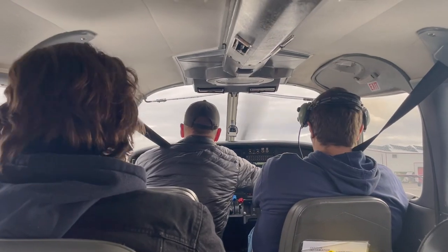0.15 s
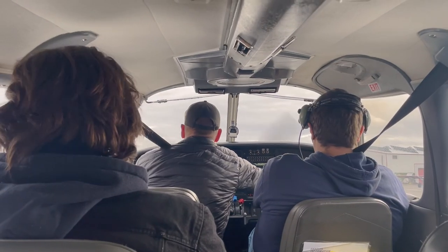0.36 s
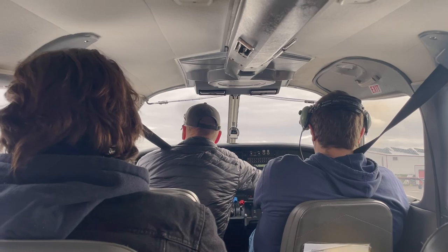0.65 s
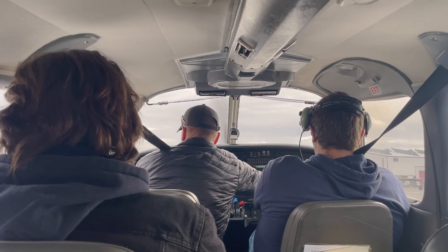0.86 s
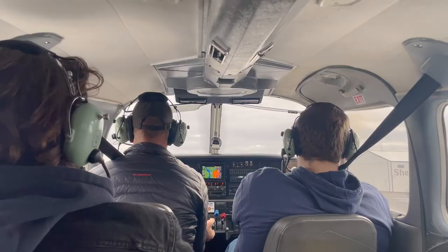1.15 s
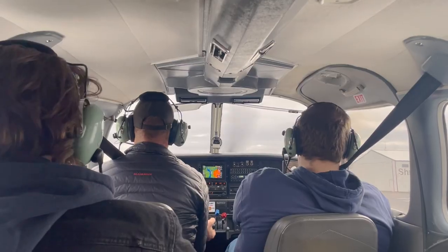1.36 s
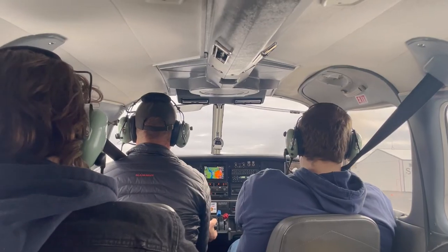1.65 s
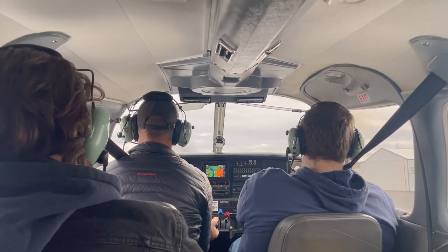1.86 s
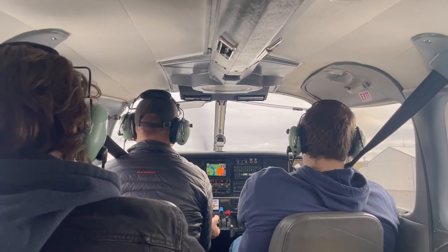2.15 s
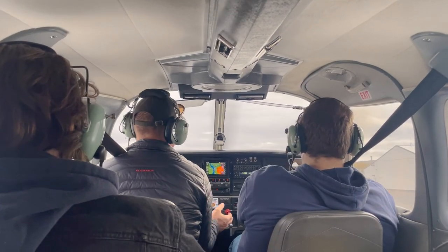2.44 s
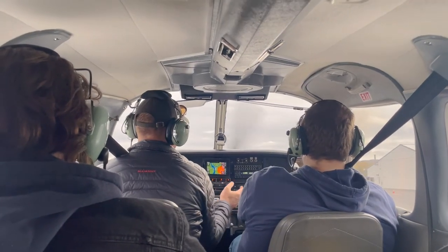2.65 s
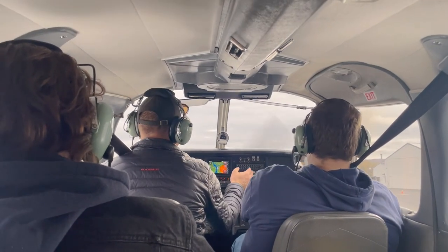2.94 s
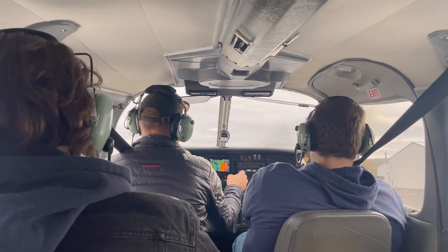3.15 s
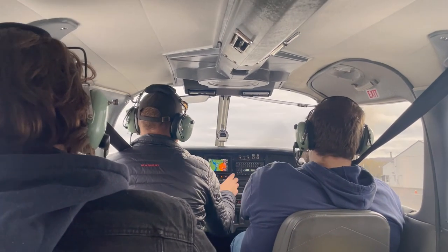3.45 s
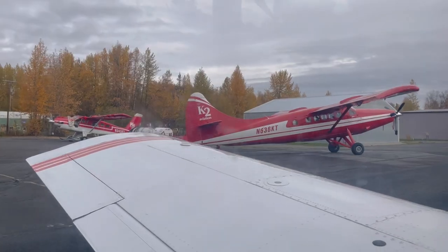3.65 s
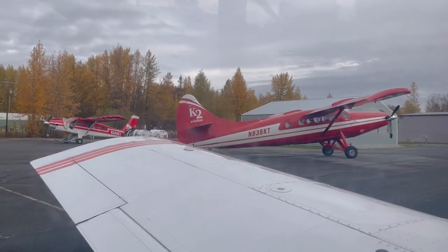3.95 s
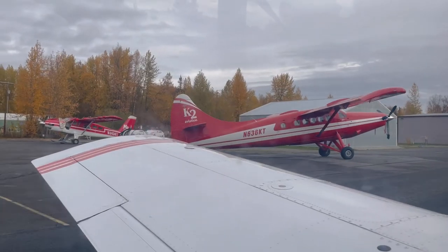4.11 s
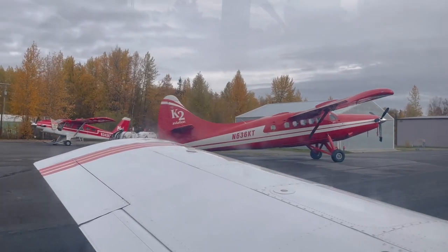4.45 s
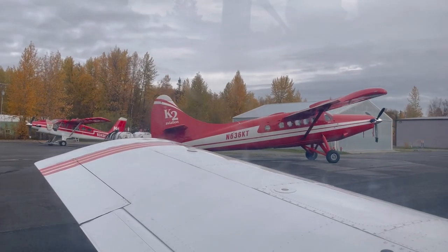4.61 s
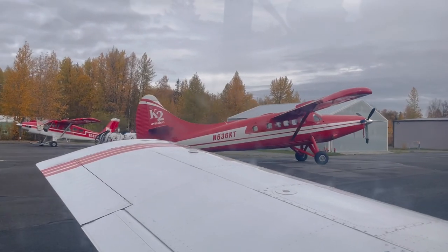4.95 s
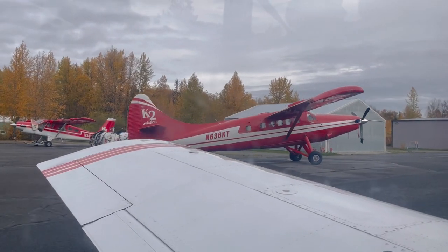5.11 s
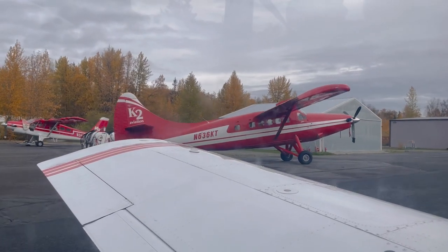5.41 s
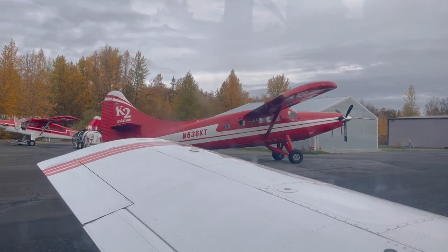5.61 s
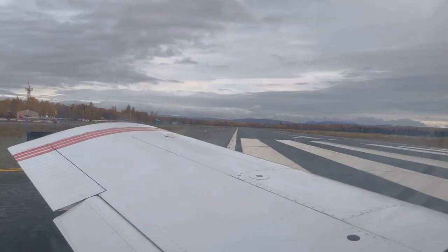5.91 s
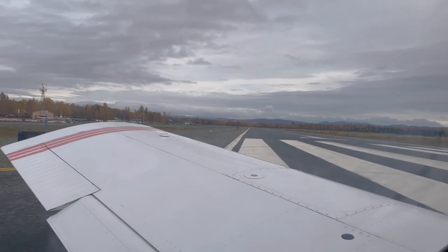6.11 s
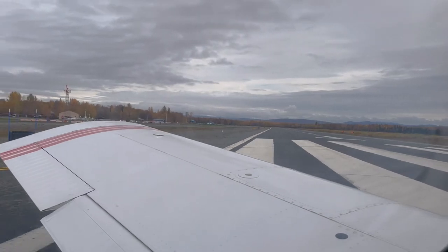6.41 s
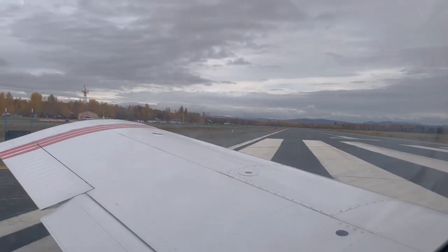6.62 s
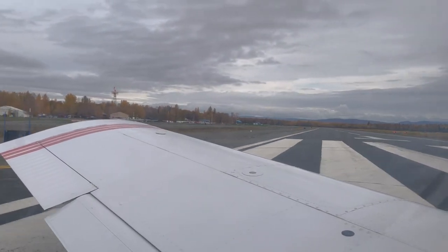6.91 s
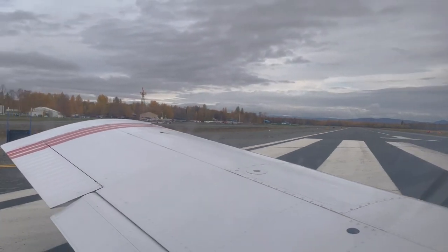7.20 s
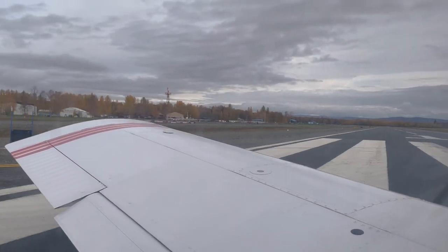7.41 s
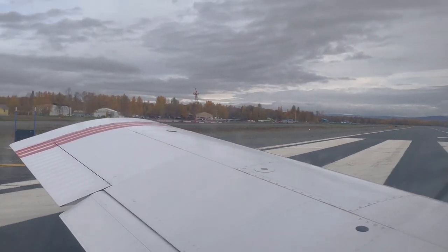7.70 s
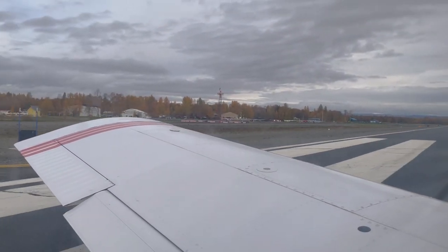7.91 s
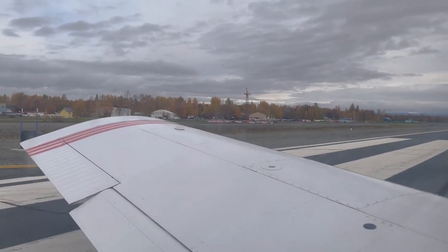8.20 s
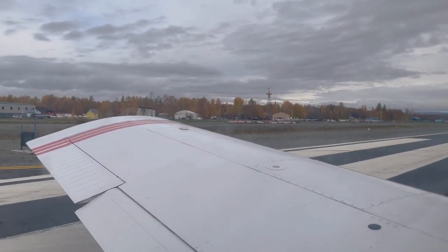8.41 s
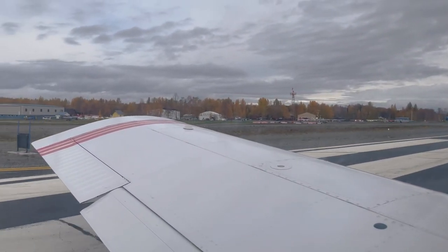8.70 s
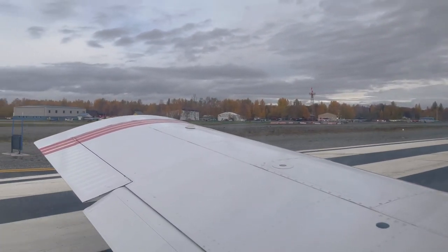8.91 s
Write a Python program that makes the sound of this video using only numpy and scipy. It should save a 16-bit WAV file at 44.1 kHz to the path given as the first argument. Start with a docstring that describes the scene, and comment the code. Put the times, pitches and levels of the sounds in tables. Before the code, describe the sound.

A stereo microphone inside a light aircraft catches four abrupt stretches of continuous engine. First a rough, rumbling lope, then a smoother throbbing idle with airy clatter, soft plastic clicks and barely audible electrical whine. A brief dropout leads to a fuller, bassier drone near the window with dry, dense trim rattles that thin out; finally the taxiing engine runs faster and stronger, the ticks continuing, then sparse near the end.

```python
"""Inside the cabin of a small piston aircraft: four moments that follow one another abruptly.
From mid cabin the freshly started engine lopes, then idles evenly; after a short gap it is heard
close by the wing window, then taxiing faster. Shaft orders make the propeller and exhaust boom,
shaped noise makes wash and clatter pulsing with the shaft, and short noise bursts make the ticks
of the window trim, the engine's clacks and the gear clicks. Faint sines whine in the panel."""
import sys
import numpy as np
from scipy.fft import rfft, irfft, next_fast_len
from scipy.io import wavfile
from scipy.ndimage import uniform_filter1d, minimum_filter1d, map_coordinates

SR = 44100
rng = np.random.default_rng(int(sys.argv[2]) if len(sys.argv) > 2 else 0)


def master(y):
    """Save y as 16-bit WAV."""
    cut = np.clip(np.atleast_2d(y).T, -1, 1)
    pcm = np.round(cut * 32767)  # scale
    wavfile.write(sys.argv[1], SR, pcm.astype(np.int16))


N = 399546

# the four moments: start_s, end_s, shaft angle at the start [turns]
COLD_SPAN = (0, 1.18, .547)
IDLE_SPAN = (1.18, 3.485, -.16)
WING_SPAN = (3.5155, 5.768, -.007)
TAXI_SPAN = (5.768, 9.1, -.287)
# shaft speed, held beyond the end points; the idle sags, and the throttle opens at the end of
# the taxi: time_s, shaft_hz
COLD_SPEED = [(0, 17.013)]
IDLE_SPEED = [(1.18, 20.333), (2.2, 20.227), (2.95, 20.193), (3.25, 19.973)]
WING_SPEED = [(3.5, 20.747)]
TAXI_SPEED = [(8.5, 23.609), (9.05, 23.853)]
# crankshaft orders, 3 = blades and firings, 1.5 = one bank, other halves = unequal cylinders:
# order [multiple of shaft speed], relative level_db
COLD_ORDERS = [(1.0, -50), (2.0, -36), (3.0, -24), (4.5, -16.5), (5.0, -31.5), (5.5, -42), (6.0, -28.0),
               (6.5, -36), (7.0, -35), (7.5, -41), (8.0, -41), (9.0, -25.5), (9.5, -45.0), (10.0, -37),
               (10.5, -44), (11.0, -37), (11.5, -56.5), (12.0, -58), (12.5, -50), (13.0, -53), (13.5, -51),
               (14.0, -49), (14.5, -61.5), (15.0, -46), (17.0, -57), (17.5, -57), (18.0, -54.5),
               (23.5, -65.5), (24.0, -55.5), (25.5, -58), (27.0, -51.5), (28.0, -67), (31.0, -66),
               (34.0, -55.5), (36.5, -70.5), (38.5, -73), (39.0, -65), (40.0, -68.0), (42.0, -60),
               (44.0, -72.5), (58.5, -63)]
IDLE_ORDERS = [(1.0, -51.5), (1.5, -36.5), (2.0, -39.5), (3.0, -14), (3.5, -34), (4.0, -44.0), (4.5, -16.5),
               (5.0, -49.5), (5.5, -48), (6.0, -20), (6.5, -36), (7.0, -49.5), (7.5, -29), (8.0, -42),
               (8.5, -41.5), (9.0, -35.5), (9.5, -54.5), (10.0, -49), (10.5, -41), (11.0, -51.5),
               (12.5, -56), (13.0, -60), (13.5, -61), (14.0, -60), (14.5, -59), (15.0, -60), (15.5, -58.0),
               (16.0, -50), (16.5, -55.5), (17.0, -60), (19.5, -56.5), (22.0, -56.5), (23.0, -67.5),
               (23.5, -56.5), (24.0, -60), (25.0, -57.0), (25.5, -61), (28.5, -56), (29.0, -60.5)]
WING_ORDERS = [(1.0, -58.5), (1.5, -40.5), (2.0, -42), (3.0, -11), (4.0, -43), (4.5, -21.5), (5.0, -22.5),
               (5.5, -44), (6.0, -18.0), (6.5, -39.0), (7.0, -51.5), (7.5, -24.0), (8.0, -41), (8.5, -30),
               (9.0, -47), (9.5, -56.5), (10.0, -32), (10.5, -34.5), (11.0, -42.5), (11.5, -59.5),
               (12.0, -48), (12.5, -45.5), (13.0, -48), (13.5, -54.5), (14.0, -48), (14.5, -47),
               (15.0, -42.5), (15.5, -40), (16.5, -52), (17.0, -50.5), (17.5, -57.5), (18.0, -49),
               (19.0, -69), (19.5, -61.5), (20.0, -63), (20.5, -58.5), (21.0, -51.5), (21.5, -60),
               (22.0, -59), (22.5, -58), (23.0, -65), (23.5, -54.5), (24.0, -47.5), (25.0, -56),
               (25.5, -63.5), (27.0, -60.5), (30.0, -59.5), (33.0, -54.5), (33.5, -61.5)]
TAXI_ORDERS = [(1.5, -35), (2.0, -42), (3.0, -9.0), (4.0, -34.5), (4.5, -22.0), (5.0, -31.5), (5.5, -36.5),
               (6.0, -17.5), (6.5, -42.5), (7.0, -36.5), (7.5, -25.0), (8.0, -50.5), (8.5, -49.5),
               (9.0, -40.5), (9.5, -46.5), (10.0, -41), (10.5, -44), (11.0, -56.5), (11.5, -62.5),
               (12.0, -43.5), (12.5, -49.5), (13.0, -49), (13.5, -53.5), (14.0, -49), (14.5, -58),
               (15.0, -43.5), (15.5, -47.5), (16.5, -55.5), (17.0, -55.5), (17.5, -52.5), (18.0, -64),
               (18.5, -65), (19.0, -58.5), (19.5, -58.5), (20.0, -50), (20.5, -50), (21.5, -69),
               (22.5, -53.5), (23.0, -63.5), (24.0, -60.5), (24.5, -55.5), (25.0, -57.5), (25.5, -57.5),
               (26.0, -58), (27.0, -65), (27.5, -62), (29.5, -65), (30.5, -66), (31.5, -56), (32.0, -63),
               (32.5, -58.5), (33.0, -58)]
# the cabin's answer to one exhaust puff: frequency_hz, relative level_db
EXHAUST_BOOM = [(14, -51.5), (25, -19), (40, -5.5), (62, -2.5), (90, -9), (130, -3.5), (175, -11.5),
                (230, -20), (320, -46), (600, -79), (2000, -130)]
# propeller wash and engine clatter through the hull: frequency_hz, relative level_db
COLD_WASH = [(160, -45.5), (280, -5.5), (350, -6.5), (430, -5), (530, -11), (720, -10), (870, -5),
             (980, -9.5), (1090, -6), (1400, -17.5), (1620, -17.5), (1840, -16), (1970, -20), (2700, -30),
             (2890, -25.5), (3300, -30.5), (5000, -33.5), (5700, -37.5), (6700, -35), (7700, -45),
             (13400, -39.5), (16000, -48.5)]
IDLE_WASH = [(140, -37), (240, -3), (312, -3.5), (421, -12.5), (485, -5.5), (545, -9.5), (590, -7),
             (640, -8), (690, -5), (790, -8.5), (860, -4), (950, -5), (1110, -6.5), (1200, -11),
             (1500, -10.5), (1590, -19.5), (1820, -12), (2020, -23.5), (2280, -19.5), (2500, -28),
             (2920, -24), (3600, -31.5), (4600, -30.5), (5500, -38.5), (6500, -35.5), (7800, -48.5),
             (13400, -38.5), (16000, -46.5)]
WING_WASH = [(150, -39.5), (240, -13), (330, -10), (420, -11.5), (510, -14), (570, -23), (640, -17.5),
             (820, -24), (910, -19), (1000, -25.5), (1450, -23), (1850, -33.5), (2400, -32), (3200, -37.5),
             (4500, -43), (6250, -48), (8600, -55.5), (13400, -47.5), (16000, -66)]
TAXI_WASH = [(140, -27.5), (230, -6), (290, -6), (360, -10.5), (470, -13), (600, -19.5), (667, -20),
             (769, -19.5), (969, -21), (1060, -15.5), (1200, -24.5), (1300, -23), (1700, -29), (2040, -31),
             (2660, -30), (3700, -39), (5000, -40.5), (5700, -44.5), (6950, -45.5), (8600, -54.5),
             (12900, -44), (16000, -61)]
# clatter of the six cylinders in firing order: mean rise of each stroke over the lull [dB]
COLD_STROKES = [1.8, 3.5, 2, 1.4, 3.3, 1.2]
IDLE_STROKES = [3.3, 4.9, 3.5, 2.4, 2, 5.8]
WING_STROKES = [2.9, 1.2, 3.5, 4.1, 1, 3.4]
TAXI_STROKES = [4, 1.8, 3.6, 4.8, 0.67, 1.7]
# stereo width in mid cabin and at the window: frequency_hz, relative side_level_db
AISLE_WIDTH = [(60, -28.5), (110, -10), (200, -2.5), (380, -4.5), (700, -3.5), (1290, -2), (2380, -2.5),
               (4400, -3), (8120, 7), (15000, -5.5)]
WINDOW_WIDTH = [(60, -16.5), (110, -15), (200, -16), (380, -4), (700, 6), (1290, 4.5), (2380, -3.5),
                (4400, -4), (8120, 9), (15000, -6.5)]
# lean of the wash: frequency_hz, left_minus_right_db
WASH_LEAN = [(200, 9), (350, 3), (700, 4), (1400, 1.5), (2500, -1), (5000, 2.5), (10000, -1)]
# the upper orders are stronger on the left: frequency_hz, relative lean_db (added left, taken right)
DRONE_LEAN = [(180, 0), (280, 1.5), (700, 2.5)]
# harder clacks of the engine, around the start of the idle and later in it: start_s, level_db
KNOCKS = [(1.098, -36), (1.112, -36), (1.278, -34.5), (1.381, -38), (1.472, -35.5), (1.51, -43),
          (2.263, -42)]
# their colour through the hull: frequency_hz, relative level_db
KNOCK_COLOUR = [(300, -17.5), (800, 4.5), (1300, -4), (2300, -20), (4000, -34), (8000, -51)]
# ticks of the window trim, in relative levels: start_s, panel knock_db, edge snap_db,
# higher ring_db, sizzle_db
TICKS = [(3.5376, -32, -37.5, -46.5, -49.5), (3.5723, -27.5, -37, -38, -44.5),
         (3.6149, -27.0, -35.5, -37.5, -44.5), (3.6363, -48.0, -63.5, -50, -50.5),
         (3.74, -28.5, -39, -47.5, -42.5), (3.783, -27.5, -47.5, -44.5, -44.5),
         (3.8373, -35, -46.5, -43.5, -46.5), (3.8845, -32, -41.5, -46.5, -45.5),
         (3.9555, -34, -44.5, -48, -48.5), (3.9956, -28, -41, -49, -49.5),
         (4.0125, -38, -42.5, -50.5, -49.5), (4.0224, -34, -45.5, -48, -47), (4.054, -29.5, -34, -45, -43),
         (4.1002, -25.5, -42, -40, -41.5), (4.149, -28, -38, -43.5, -43), (4.177, -40, -45.0, -51.5, -53),
         (4.2077, -32.0, -45.5, -46.5, -47.0), (4.2234, -31.5, -45.0, -46.5, -49),
         (4.267, -28, -37, -42, -47), (4.3225, -35, -49.5, -47, -50), (4.4869, -34.0, -37.0, -46.5, -42),
         (4.5688, -29, -38, -40.5, -43), (4.5808, -38, -40.5, -45.5, -47.5), (4.7046, -31, -39, -47.5, -44),
         (4.7642, -44, -50, -55.5, -53.5), (4.8017, -36.5, -38.5, -47, -45.5),
         (4.8994, -41, -43.5, -49.5, -55), (4.9214, -36.0, -40.5, -50, -48.5),
         (5.0179, -28, -36.5, -47.5, -43), (5.2345, -44, -50.5, -51, -47), (5.3305, -30, -40, -42, -42),
         (5.4025, -47, -50, -55.5, -54.5), (5.5015, -44, -48.5, -54, -49.5),
         (5.8118, -36.0, -41.5, -44, -48), (5.852, -37, -38, -48, -48), (5.9992, -41, -38.0, -52, -48),
         (6.0243, -39, -44, -56, -62.5), (6.1392, -34, -36.5, -47.5, -47.5),
         (6.1694, -36.5, -37.5, -51.5, -52), (6.2594, -39, -44, -50, -55.0),
         (6.2711, -42.5, -51.5, -51.5, -48.5), (6.3195, -41.5, -42.5, -49, -52),
         (6.3425, -45, -45.5, -58, -67.5), (6.391, -32, -42, -51.5, -50.0), (6.4053, -37, -49, -52, -61),
         (6.4572, -40, -39.5, -48, -50.5), (6.4825, -35, -38.5, -45, -46), (6.4892, -35, -41, -49, -48),
         (6.547, -33, -41.5, -51.5, -51), (6.797, -36, -39.0, -51, -49.0),
         (6.8968, -45.5, -47.5, -57, -46.0), (6.9977, -34, -49, -54.5, -58.5),
         (7.0813, -34.5, -37, -38.5, -40.5), (7.2361, -46, -39, -54, -49.5),
         (7.263, -39, -36.5, -51.5, -48), (7.3467, -34.5, -40, -43, -44.5), (7.425, -33.5, -41, -51, -49),
         (7.4637, -35.5, -42, -46.5, -42.5), (7.5484, -28.5, -32.5, -43, -46),
         (7.6892, -39, -37.5, -43.5, -45), (7.7173, -36, -47, -50.5, -50), (7.7758, -36, -37, -50.5, -45.0),
         (7.8673, -44.5, -51, -55, -67), (7.9275, -33.5, -43, -49, -45),
         (7.9755, -41.5, -39.5, -49.5, -50.0), (8.0029, -33, -33.5, -49, -43.0),
         (8.0149, -35.5, -41.5, -46.5, -50.5), (8.268, -52, -57.5, -61.5, -49),
         (8.3056, -45.5, -44, -54.5, -49), (8.3197, -23, -35, -45.5, -42), (8.3505, -37, -46.5, -51.0, -52),
         (8.4001, -37.5, -36, -43, -45), (8.4175, -38.0, -56, -67, -51.0),
         (8.438, -41.5, -54, -49.5, -54.5), (8.5525, -40, -37.5, -38.5, -41.5), (8.9, -39, -45, -50.5, -57)]
# resonances of the panel, the edge's snap and its higher ring: centre_hz, width_hz, relative level_db
PANEL_RESONANCES = [(700, 550, -5), (920, 63, 3.5), (1400, 850, -2), (1800, 300, -6)]
SNAP_RESONANCES = [(1770, 690, -4.5), (2320, 250, 1), (2770, 420, -1), (3320, 440, -8)]
RING_RESONANCES = [(4700, 790, -9), (5350, 290, 7.5), (6100, 340, -6), (7200, 750, -12)]
# the broad crack of the contact: frequency_hz, relative level_db
CRACK = [(400, -22), (1200, -9), (3000, -10), (7000, -15), (11000, -26)]
# the sizzle above it: frequency_hz, relative level_db
SIZZLE_COLOUR = [(5000, -24), (8500, -13.5), (10500, -0.5), (13000, 3), (16000, 0)]
# small clicks of gear in the cabin: start_s, relative peak_db
GEAR = [(0.111, -37.5), (0.136, -37), (0.3074, -31), (0.335, -22.5), (0.3411, -31.5), (1.4667, -31),
        (1.5689, -36), (1.6373, -33.5), (1.6932, -35), (2.413, -27.5), (2.731, -30.5), (2.8411, -32),
        (2.969, -35.5), (3.258, -33.5), (3.3044, -35), (3.3972, -31)]
# their colour: frequency_hz, relative level_db
GEAR_COLOUR = [(400, -0.5), (1000, 2.5), (2500, 2.5), (4000, -2.5), (6000, -1), (9000, -11.5), (13000, -7),
               (16000, -16.5)]
# the main whine of the instrument panel, before its flicker: time_s, pitch_hz, level_db
PANEL_WHINE = [(0, 4447, -71), (0.5, 4447, -75), (1.12, 4447, -74), (1.125, 4511, -68), (2.45, 4511, -68),
               (3.05, 4511, -73), (3.485, 4511, -72), (3.52, 4511, -110)]
# fainter steady-pitched tones beside it, before their flicker: pitch_hz, level_db, start_s, end_s
FAINT_WHINES = [(6675, -73, -.2, 1.25), (6449, -76, -.2, 1.25), (6312, -79, 1.1, 3.485),
                (13450, -81, 2.0, 3.2), (6312, -78, 3.516, 5.768)]
# pops where the sound jumps: start_s, step level_db
JUMPS = [(1.1806, -12), (3.484, -31), (3.5153, -3.5), (5.769, -18)]


def engine(span, speed, orders, spectrum, width, strokes_db, drone_db, rumble_db, tilt_db, wash_db,
           wash_db_per_s, waver_db, spread, stroke_at, firing_at):
    """One turning shaft drives drone, rumble and wash; stroke_at and firing_at are shaft angles in turns."""
    drone_db_per_hz, wash_db_per_hz = 0.5, -0.5  # level change per Hz of shaft speed
    swell_db, swell_hz, edge_s = 0.3, 11, 0.005
    start, end, first_turn = span
    t = np.arange(round(start * SR), min(N, round(end * SR))) / SR
    shaft_hz = np.interp(t, *np.transpose(speed))
    turns = first_turn + np.cumsum(shaft_hz) / SR
    faster_hz = shaft_hz - shaft_hz.mean()

    boom_level = drone_db + drone_db_per_hz * faster_hz
    air_level = wash_db + wash_db_per_hz * faster_hz + wash_db_per_s * (t - t.mean())
    air_level = air_level + swell_db * wobble(t, swell_hz)

    tones = drone(t, turns, orders, width, waver_db, spread)
    rumble = amp(rumble_db) * uneven_firing(turns, tilt_db)
    boom = amp(boom_level) * unit(tones + rumble)
    air = amp(air_level) * wash(t, turns, spectrum, width, strokes_db, stroke_at, firing_at)
    edges = np.sin(np.pi / 2 * np.clip(np.minimum(t - start, end - t) / edge_s, 0, 1)) ** 2
    out = np.zeros((2, N))
    add(out, start, edges * (boom + air))
    return out


def drone(t, turns, orders, width, waver_db, spread):
    """Blades and firings push the cabin air in step; the orders of the unequal cylinders fall where they may."""
    left_db, side_db = -0.8, -6.0  # offsets of the lean and width tables
    mid, side = np.zeros((2, len(t)))
    mean_shaft_hz = np.ptp(turns) / np.ptp(t)
    knots = t[::SR // 100]  # the slow waver is drawn at 100 Hz
    for order, db in orders:
        in_step = order % 1.5 == 0 and order < 10
        if in_step:
            phase = spread * (order / 1.5 - 2) * (order / 1.5 - 3)
        else:
            phase = rng.uniform(0, 2 * np.pi)
        angle = 2 * np.pi * order * turns + phase
        # higher orders waver more
        waver = waver_db * np.sqrt(order) * wobble(knots, 4)
        size = np.interp(t, knots, amp(db + waver))
        mid -= size * np.cos(angle)
        side += size * np.sin(angle) * amp(along(width, order * mean_shaft_hz) + side_db)

    def lean(hz):
        return amp(np.outer([1, -1], left_db + along(DRONE_LEAN, hz)))

    return unit(filtered(np.array([mid + side, mid - side]), lean))


def uneven_firing(turns, tilt_db):
    """Each firing is a little stronger or weaker than the mean, which rumbles between the orders."""
    firing_count = np.floor(3 * turns)  # three firings a turn
    fires = np.diff(firing_count, prepend=firing_count[0])
    puffs = fires * rng.standard_normal(len(turns))
    # tilt_db is per octave
    return unit(filtered(puffs, lambda hz: amp(along(EXHAUST_BOOM, hz) + tilt_db * np.log2(hz + 1))))


def wash(t, turns, spectrum, width, strokes_db, stroke_at, firing_at):
    """Rushing air and cyclic clatter: the low part swells with every firing, the upper with each stroke."""
    firing_throb = 0.23  # exponent of the low swell
    flutter_db, scatter_db, ripple_db = 1.0, 1.8, 2.4
    locked, locked_hz = 0.25, 1500  # share of power that repeats with the engine cycle, and its upper limit
    split_hz, hiss_hz = 600, 4130  # below: firing swell; between: strokes; above: smooth hiss

    firings = 3 * (turns - stroke_at)
    cylinder = np.round(firings).astype(int) % len(strokes_db)
    rise_db = np.array(strokes_db)[cylinder] + scatter_db * wobble(firings, 0.97)
    stroke = amp(np.cos(np.pi * firings) ** 2 * rise_db)

    def share(hz):
        return locked / (1 + (hz / locked_hz) ** 4)

    air = filtered(rng.standard_normal((2, len(t))), lambda hz: np.sqrt(1 - share(hz)))
    air = air + filtered(clatter(turns), lambda hz: np.sqrt(share(hz)))

    def cabin_modes(hz):
        """Many close modes ripple the spectrum."""
        return amp(ripple_db * np.array([wobble(np.sqrt(hz), 0.97), wobble(np.sqrt(hz), 0.92)]))

    air = filtered(air, cabin_modes)
    low = filtered(air, lambda hz: 1 / (1 + (hz / split_hz) ** 6))
    hiss = filtered(air, lambda hz: 1 - 1 / (1 + (hz / hiss_hz) ** 4))
    throbbing = low * np.exp(firing_throb * np.cos(6 * np.pi * (turns - firing_at)))
    beating = (air - low - hiss) * unit(stroke)
    # the wash flutters irregularly under the smooth hiss
    air = (throbbing + beating) * amp(flutter_db * wobble(t, 29.99)) + hiss

    def mid_side_colour(hz):
        return amp(along(spectrum, hz)) * np.array([np.ones_like(hz), amp(along(width, hz))])

    mid, side = filtered(air, mid_side_colour)
    # the level is referred to the middle band
    body = np.std(filtered(mid, lambda hz: (hz > 400) & (hz < 2000)))
    pair = np.array([mid + side, mid - side]) / body
    return filtered(pair, lambda hz: amp(np.outer([.5, -.5], along(WASH_LEAN, hz))))


def clatter(turns):
    """Valves and gears make the same racket in every engine cycle of two turns."""
    length = int(2 * len(turns) / np.ptp(turns))  # samples in a mean cycle
    place = (turns / 2 % 1) * length
    cycles = rng.standard_normal((2, length))
    return np.array([map_coordinates(cycle, [place], mode="grid-wrap") for cycle in cycles])


def engine_knocks():
    """The engine clacks harder a few times around the start of the idle and later in it, dulled by the hull."""
    rise_s = 0.005
    out, t = np.zeros((2, N)), np.arange(SR // 16) / SR
    swell = t / rise_s * np.exp(1 - t / rise_s)
    for s, db in KNOCKS:
        noise = rng.standard_normal((2, len(t)))
        clack = unit(filtered(noise, lambda hz: amp(along(KNOCK_COLOUR, hz))))
        mid, side = clack * [[1], [.5]]
        add(out, s, amp(db) * swell * np.array([mid + side, mid - side]))
    return out


def trim_ticks():
    """The trim's edge scrapes, snaps and rings on the window frame and the panel knocks, swelling slower."""
    knock_gain_db, snap_gain_db = -0.5, 1.5
    scrape_s, swing_s = 0.0013, 0.0051  # rise of the edge's contact and of the panel's knock
    edge_lag_s, knock_lag_s = 0.000442, 0.0003  # the left side hears it first
    soft_hz = 2600  # the knock is dulled above this
    echo_t60_s, echo_db = 0.055, -19  # the dry cabin answers each tick briefly
    out, t = np.zeros((2, N)), np.arange(SR // 16) / SR

    def crack(hz):
        return 1j * amp(along(CRACK, hz))

    def burst(rise_s, colour, lag_s):
        """A rough contact and its cabin echoes, at rms 1 over 10 ms."""
        contact = (t / rise_s * np.exp(1 - t / rise_s)) ** 2 * rng.standard_normal(len(t))
        echo_decay = amp(echo_db - 60 * t / echo_t60_s) * np.minimum(t / rise_s, 1)
        echoes = echo_decay * rng.standard_normal((2, len(t)))
        delayed = lambda hz: colour(hz) * np.exp(-2j * np.pi * np.outer([0, lag_s], hz))
        pair = filtered(contact + echoes, delayed)
        return pair / np.sqrt(np.sum(pair ** 2) / (.02 * SR))  # 10 ms on each of two sides

    for s, knock_db, snap_db, ring_db, sizzle_db in TICKS:
        panel_tone = resonances(PANEL_RESONANCES)
        snap_tone = resonances(SNAP_RESONANCES)
        ring_tone = resonances(RING_RESONANCES)
        knock = burst(swing_s, lambda hz: panel_tone(hz) / (1 + 1j * hz / soft_hz) ** 2, knock_lag_s)
        snap = burst(scrape_s, lambda hz: snap_tone(hz) + crack(hz), edge_lag_s)
        ring = burst(scrape_s, lambda hz: ring_tone(hz) + crack(hz), edge_lag_s)
        sizzle = burst(scrape_s, lambda hz: amp(along(SIZZLE_COLOUR, hz)), 0)
        tick = amp(knock_db + knock_gain_db) * knock + amp(snap_db + snap_gain_db) * snap
        add(out, s, tick + amp(ring_db) * ring + amp(sizzle_db) * sizzle)
    return out


def resonances(table, scatter_db=1):
    """The summed response of a table's resonances; each contact excites them a little differently."""
    gains = amp(scatter_db * rng.standard_normal(len(table)))

    def response(hz):
        total = 0
        for k, (centre, width, db) in enumerate(table):
            damping = 1j * hz * width
            # neighbours alternate in sign
            total = total + (-1) ** k * gains[k] * amp(db) * damping / (centre ** 2 - hz ** 2 + damping)
        return total

    return response


def gear_clicks():
    """Small plastic and metal things click as the occupants settle: decaying coloured noise."""
    level_db, t60_s = -3.5, 0.063
    out, t = np.zeros((2, N)), np.arange(SR // 12) / SR
    for s, db in GEAR:
        noise = amp(-60 * t / t60_s) * rng.standard_normal((2, len(t)))
        click = filtered(noise, lambda hz: amp(along(GEAR_COLOUR, hz)))
        add(out, s, amp(db + level_db) * click / np.abs(click.mean(0)).max())
    return out


def whine():
    """Faint unsteady electrical tones from the instrument panel come and go."""
    drift_rad, flicker_db, fade_s = 0.25, 3.5, 0.21
    t = np.arange(N) / SR

    def tone(cycles, db):
        """A flickering sine whose phase wanders apart on the two sides."""
        level = np.sqrt(2) * amp(db + flicker_db * wobble(t, 4.6))
        drift = drift_rad * np.array([wobble(t, 15), wobble(t, 15)])
        return level * np.sin(2 * np.pi * cycles + drift)

    time_s, pitch_hz, level_db = np.transpose(PANEL_WHINE)
    cycles = np.cumsum(np.interp(t, time_s, pitch_hz)) / SR
    out = tone(cycles, np.interp(t, time_s, level_db))
    for hz, db, start, end in FAINT_WHINES:
        fade = np.clip(np.minimum(t - start, end - t) / fade_s, 0, 1)
        out += tone(hz * t, db) * fade
    return out


def pops():
    """Where the scene changes, the sound pops: a brief step that sags back at once."""
    t60_s = 0.018
    out, t = np.zeros((2, N)), np.arange(SR // 20) / SR
    for s, db in JUMPS:
        add(out, s, -np.tile(amp(db - 60 * t / t60_s), (2, 1)))
    return out


def amp(db):
    """Decibels to gain."""
    return 10 ** (np.asarray(db) / 20)


def unit(x):
    """Scale to rms 1."""
    return x / np.sqrt(np.mean(x ** 2) + 1e-20)


def along(points, hz):
    """Read (Hz, value) points on a log axis."""
    f, v = np.transpose(points)
    return np.interp(np.log(hz + 1), np.log(f + 1), v)


def wobble(t, rate):
    """A smooth random curve along t, with rate knots per unit of t."""
    return map_coordinates(rng.standard_normal(2 ** 10), [(t - t[0]) * rate], mode="mirror")


def filtered(x, response):
    """x times a response of frequency, padded so that the tail does not wrap round."""
    n = x.shape[-1]
    m = next_fast_len(n + SR // 4)
    return irfft(rfft(x, m) * response(np.fft.rfftfreq(m, 1 / SR)), m)[..., :n]


def add(track, s, sound):
    """Mix a stereo sound into the track at time s."""
    part = track[:, round(s * SR):][:, :sound.shape[-1]]
    part += sound[:, :part.shape[-1]]


def scene():
    """The four stretches of running, with the small sounds of the cabin."""
    cold = engine(COLD_SPAN, COLD_SPEED, COLD_ORDERS, COLD_WASH, AISLE_WIDTH, COLD_STROKES,
                  drone_db=-13.5, rumble_db=-8, tilt_db=-6.5, wash_db=-41.0, wash_db_per_s=0.5,
                  waver_db=0.04, spread=-0.912, stroke_at=0.069, firing_at=0.13)
    idle = engine(IDLE_SPAN, IDLE_SPEED, IDLE_ORDERS, IDLE_WASH, AISLE_WIDTH, IDLE_STROKES,
                  drone_db=-10.5, rumble_db=-17.0, tilt_db=0.5, wash_db=-40, wash_db_per_s=-0.05,
                  waver_db=0.14, spread=-0.45, stroke_at=0.25, firing_at=0.058)
    wing = engine(WING_SPAN, WING_SPEED, WING_ORDERS, WING_WASH, WINDOW_WIDTH, WING_STROKES,
                  drone_db=-10, rumble_db=-15.5, tilt_db=4.0, wash_db=-41.5, wash_db_per_s=-1.0,
                  waver_db=0.4, spread=-0.34, stroke_at=0.18, firing_at=0.2)
    taxi = engine(TAXI_SPAN, TAXI_SPEED, TAXI_ORDERS, TAXI_WASH, WINDOW_WIDTH, TAXI_STROKES,
                  drone_db=-7.5, rumble_db=-19.0, tilt_db=0.5, wash_db=-40.0, wash_db_per_s=0.24,
                  waver_db=0.28, spread=0.53, stroke_at=.17, firing_at=.31)
    running = cold + idle + wing + taxi + engine_knocks()
    return running + trim_ticks() + gear_clicks() + whine() + pops()


def record(dry):
    """The microphone pair's limiter holds the boom under a ceiling; nothing is kept above the band limit."""
    ceiling, top_hz = 0.87, 16000
    needed = ceiling / np.maximum(np.abs(dry).max(0), ceiling)
    # hold the lowest gain over 25 ms, then smooth it
    gain = uniform_filter1d(minimum_filter1d(needed, SR // 40), SR // 40)
    return filtered(dry * gain, lambda hz: hz < top_hz)


dry = scene()
out = record(dry)
master(out)
```